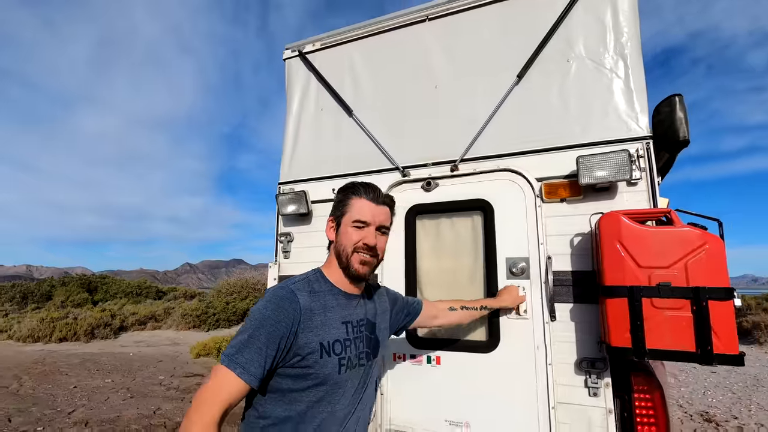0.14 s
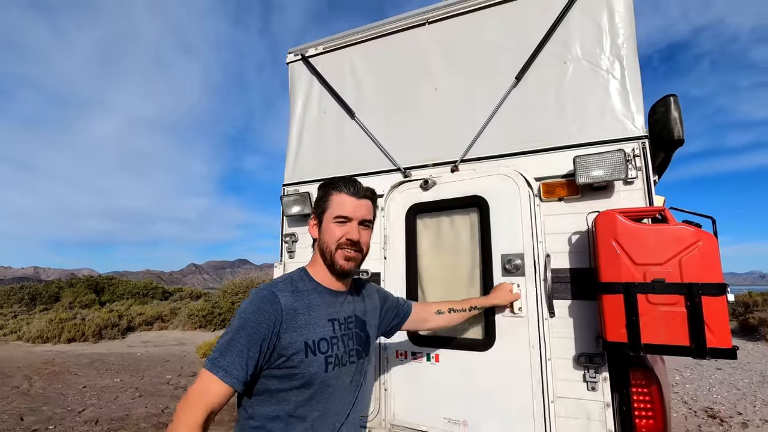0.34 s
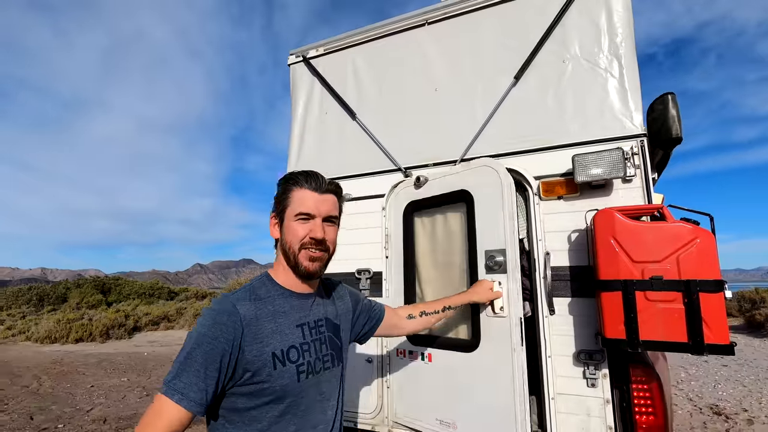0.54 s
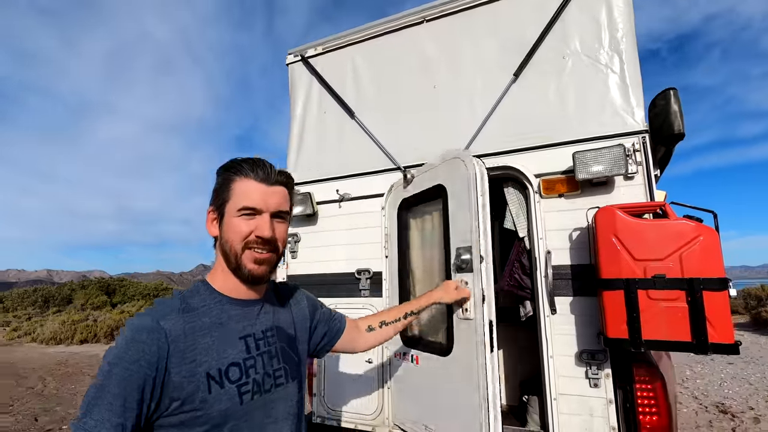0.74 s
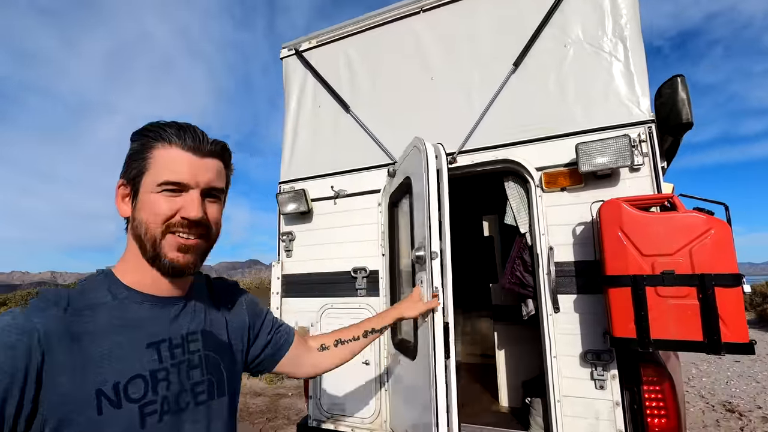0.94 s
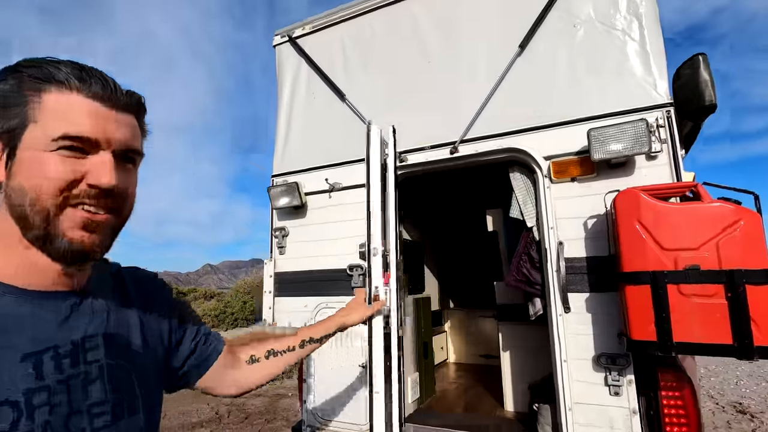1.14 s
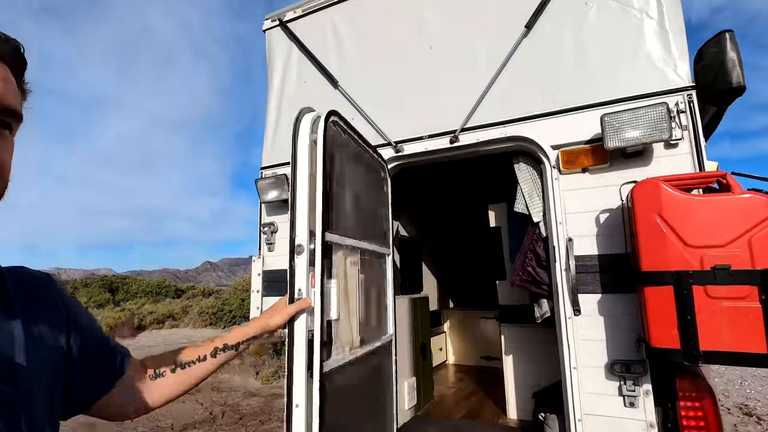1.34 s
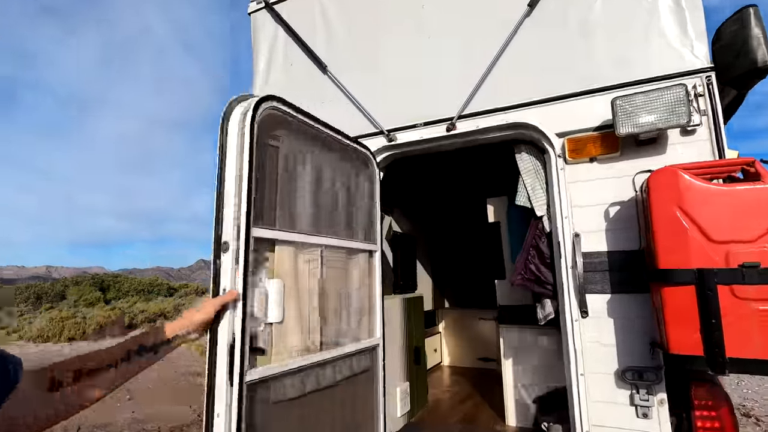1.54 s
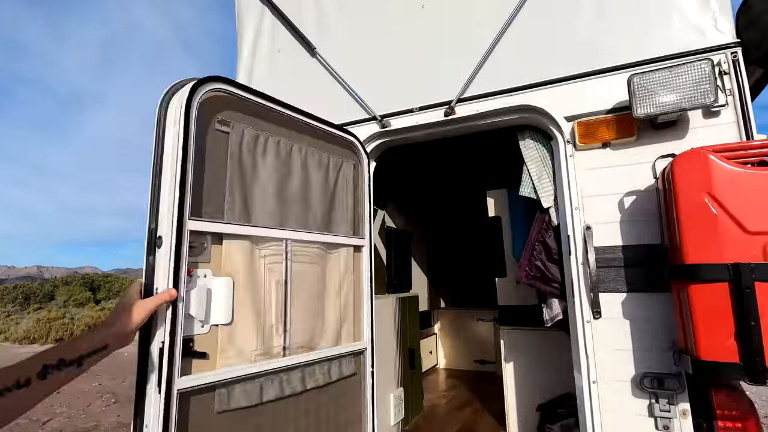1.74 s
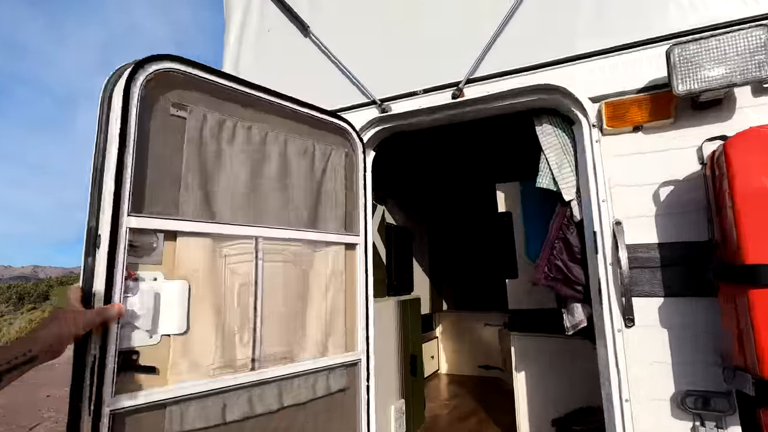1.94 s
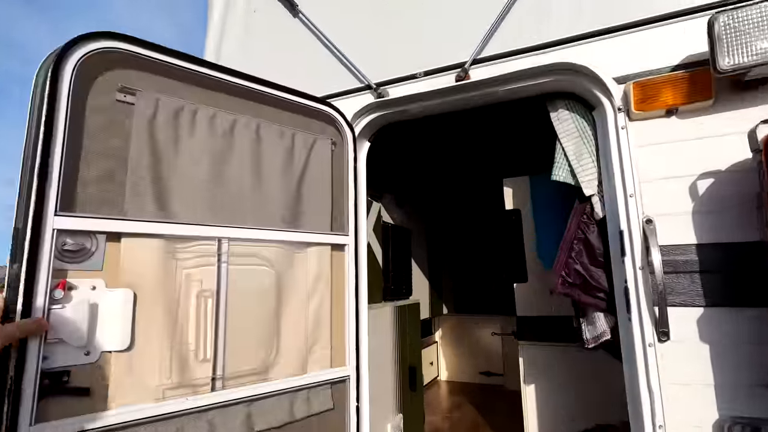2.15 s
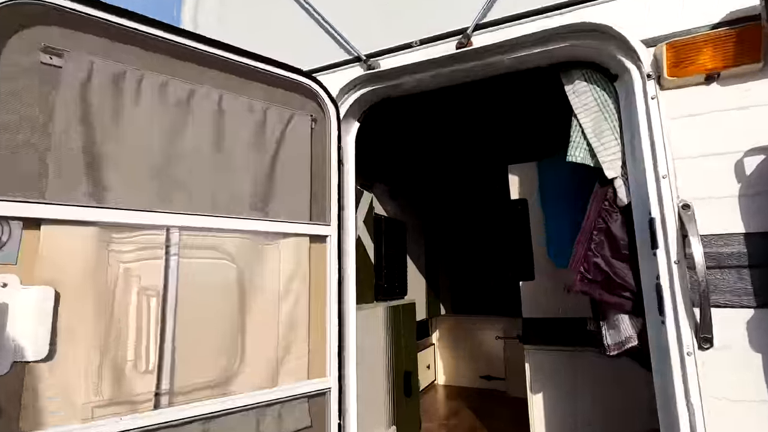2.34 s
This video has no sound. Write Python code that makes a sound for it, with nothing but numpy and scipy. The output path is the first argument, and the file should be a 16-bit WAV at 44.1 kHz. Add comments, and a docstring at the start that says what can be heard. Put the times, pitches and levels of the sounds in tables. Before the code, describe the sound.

A camper door opens, heard close up outdoors with little echo. Faint ticks and handle scraping lead to a loud, hollow latch clunk at 0.24 s, with clatter to 0.35. Small knocks and a squeak precede a sharp bright snap at 0.75 s, ringing thinly. Soft seal and hinge rubbing follows, light taps near 1.1 and 1.67, then a dull rattling bump and creak at 2.12, over low engine hum.

```python
"""A camper's back door is unlatched and pulled open at arm's length, outdoors, over a small engine's hum.
The latch lets go with a thud; blows are chatters of contacts that ring the damped modes of latch and door.
The door squeaks by stick-slip and snaps free with a ringing spring, both made of decaying or gliding sines.
Shaped noise makes the handle's scraping, the rubbing of seal and hinge, and the final rattling bump.
The engine is a sum of sines at multiples of its firing rate, over filtered-noise rumble and open-air hiss."""
import sys
import numpy as np
from scipy import signal
from scipy.fft import rfft, irfft
from scipy.io import wavfile
from scipy.ndimage import uniform_filter1d

SR = 44100
rng = np.random.default_rng(int(sys.argv[2]) if len(sys.argv) > 2 else 0)


def generate_wav(signal):
    """Clip the signal to [-1, 1] and save it as 16-bit WAV at the path in sys.argv[1]."""
    frames = np.transpose(np.atleast_2d(signal))
    scaled = np.clip(frames, -1, 1) * 32767
    pcm = np.round(scaled).astype(np.int16)
    wavfile.write(sys.argv[1], SR, pcm)


N = 110250  # samples, 2.5 s

# Clicks and clunks of handle and latch; levels are relative, before the struck part colours them.
# Columns: start_s, level_450hz_db, level_1400hz_db, level_3300hz_db, level_9khz_db, t60_s
LATCH_BLOWS = [(.05,-69,-44,-56.5,-83,0.075), (.0755,-49,-36.5,-58.5,-79.5,0.04),
               (.182,-30,-42.5,-48.5,-72,0.13), (.206,-25,-46.5,-41.5,-64.5,0.074),
               (.231,-22.5,-48,-37.5,-64.5,0.19), (.2412,-5.5,-34,-19.5,-48.5,0.038),
               (.2455,-6.5,-10,-12,-32,0.025), (.2522,-19.5,-18,-15,-38.5,0.041),
               (.263,-21,-31,-26,-49.5,0.06), (.288,-31,-31.5,-29.5,-83,0.065),
               (.3235,-40,-43,-28.5,-55,0.064), (.3315,-24.5,-27,-18,-47.5,0.043)]
# Knocks of door and frame. Columns: as for the latch blows
DOOR_BLOWS = [(.3835,-28.5,-30.5,-37.5,-51,0.093), (.479,-74,-33.5,-77,-86,0.02),
              (.519,-41,-58.5,-49.5,-58,0.083), (.594,-50,-44,-42.5,-68,0.027),
              (.639,-66,-54.5,-53,-62,0.048), (.6788,-52,-47,-46,-70,0.057), (.701,-39,-37,-41.5,-71,0.11),
              (.714,-23.5,-35,-56,-53,0.055), (.7492,-39,-19.5,-7.5,-47.5,0.068),
              (.7575,-17,-9.5,-8,-33.5,0.034), (.7625,-12.5,-24.5,-16,-39.5,0.04),
              (.7685,-10,-23,-18,-52,0.057), (.796,-27,-29,-49,-74,0.077), (1.093,-44,-47.5,-53.5,-80,0.13),
              (1.117,-44.5,-35,-31,-52.5,0.046), (1.652,-45,-37,-51.5,-77.5,0.034),
              (1.656,-36.5,-43,-57,-74,0.053), (1.6665,-33.5,-35,-52,-74,0.082),
              (1.7035,-65,-47,-41,-75,0.015), (1.778,-72,-68,-50.5,-56,.015),
              (2.1115,-54.5,-45.5,-19.5,-73.5,0.046), (2.281,-57,-53,-43,-66,.05),
              (2.418,-52.5,-58.5,-60.5,-73.5,0.14)]
# Frequencies at which the blow levels are given. Column: frequency_hz
BLOW_BAND_HZ = [450, 1400, 3300, 9000]
# Colour shared by all blows. Columns: frequency_hz, gain_db
BLOW_COLOUR = [(30,-21), (150,-10), (400,4.5), (600,5), (900,4.5), (1400,4.5), (3000,3), (5000,2.5),
               (6500,-6.5), (9000,-4), (12000,-11), (15500,-19.5)]
# Resonances of the latch case. Columns: mode_hz, t60_s, relative_level_db
LATCH_MODES = [(441,0.025,0), (553.6,0.038,-4), (1410,0.0315,8), (1555,.07,-3.5), (1810,0.057,-17),
               (2108,0.042,6), (2540,0.051,-3.5), (3027,0.051,-4), (3610,0.048,-8.5), (4300,0.033,-4),
               (4670,0.033,-3)]
# Hollow middle of the latch case. Columns: frequency_hz, gain_db
LATCH_COLOUR = [(540,0), (760,-6), (1050,-7), (1400,-1)]
# Metal latch parts left ringing. Columns: start_s, pitch_hz, level_db, t60_s, damped_at_s
LATCH_RINGS = [(.3845,3268,-42,0.16,0.448), (.384,9000,-58.5,.04,.44), (0.74,2702,-51.5,0.753,1.1),
               (0.83,2700,-63.5,0.64,0.82), (.76,3607,-64,.45,0.79)]
# Resonances of the door. Columns: mode_hz, t60_s, relative_level_db
DOOR_MODES = [(380,0.093,-3), (464.5,0.063,5), (657,0.045,-15), (1057,0.07,0.5), (1180,.04,2),
              (1352,0.035,2), (1890,0.043,-3.5), (2236,.05,3.5), (2590,0.036,-3.5), (3310,0.024,3.5),
              (3860,0.027,-11)]
# Thuds of the wall and door panel. Columns: start_s, pitch_hz, level_db, t60_s
THUDS = [(.096,38,-31.5,0.19), (.121,173,-27,0.039), (.207,195.3,-22,0.07), (.2415,196.5,-15,0.076),
         (.2435,98.3,-12,0.12), (.2612,42,-14,0.25), (.263,165,-19.5,0.15), (.761,175.3,-31,0.11),
         (1.682,220,-31.5,0.0615), (2.122,97.9,-20.5,0.42), (2.124,198.5,-27.5,0.22),
         (2.125,34.8,-32.5,0.4), (2.27,108,-30,0.16)]
# Spectrum of the last bump's rattle. Columns: frequency_hz, relative_level_db
RATTLE_COLOUR = [(90,-15), (150,-6), (210,3), (290,-19.5), (420,-14), (600,-25), (800,-15), (1100,-23),
                 (1770,-21.5), (3750,-25), (5600,-30.5), (6800,-41), (15000,-59.5)]
# Spectrum of the panel shuddering after the bump. Columns: frequency_hz, relative_level_db
PANEL_COLOUR = [(110,-4), (200,14.5), (300,-3), (700,-4), (1300,-16), (3500,-29.5), (7000,-47)]
# Stick-slip squeaks and creaks; levels before roughness. Columns: start_s, length_s, first_hz, last_hz, level_db
SQUEAKS = [(0,0.048,1434,1435,-56), (0.242,0.0046,1560,1503,-22), (.285,0.0096,1560,1600,-28),
           (0.693,0.025,1372,1290,-38), (0.709,0.023,2950,2900,-37.5), (.71,0.035,2522,2156,-44.5),
           (0.711,0.029,4660,4730,-41), (0.736,.012,4635,4850,-30.5), (0.794,0.016,1283,1160,-38),
           (2.132,0.054,773,647,-34.5), (2.192,0.048,690,759,-44), (2.213,0.078,511,402.4,-50)]
# Scraping in the door skin as the hand works the handle. Columns: time_s, level_db
HANDLE_LEVEL = [(0,-44.5), (.085,-51), (.15,-57), (.215,-30), (.27,-33), (.33,-42), (.43,-59)]
# Dull spectrum of that scraping. Columns: frequency_hz, relative_level_db
HANDLE_COLOUR = [(80,-13.5), (200,16), (300,-2.5), (560,0), (850,-14), (1250,-14.5), (1450,-9.5),
                 (1700,-19), (2000,-10.5), (2500,-24), (4000,-29.5), (5100,-26.5), (6500,-44.5),
                 (15000,-67)]
# Rubbing of seal and hinge, before rustle and final fade. Columns: time_s, level_db
RUB_LEVEL = [(.16,-92), (.3,-58), (.56,-74.5), (.61,-59), (.67,-63.5), (.71,-52), (.75,-40), (.83,-70),
             (1.07,-71), (1.15,-61), (1.22,-73), (1.54,-73), (1.58,-65.5), (1.62,-74.5), (1.7,-62.5),
             (1.76,-72), (1.825,-58), (1.88,-61), (1.95,-55.5), (2.0,-63.5), (2.07,-71), (2.11,-50)]
# Spectrum of the rubbing. Columns: frequency_hz, relative_level_db
RUB_COLOUR = [(100,11.5), (450,-1), (1500,1.5), (3000,-1.5), (5400,-6.5), (6800,-16), (10000,-23),
              (16000,-46)]
# Firing rate of the engine. Columns: time_s, firing_hz
ENGINE_SPEED = [(0,70.38), (.55,73.54), (.95,72.9), (1.15,75.44), (2.5,80.68)]
# Partials of the hum; levels before waver and shading. Columns: firing_multiple, rms_level_db
ENGINE_ORDERS = [(1,-42), (1.5,-55), (2,-50.5), (3,-70.5)]
# Gain of hum and rumble as the microphone moves. Columns: time_s, gain_db
ENGINE_SHADE = [(2.35,-1.5), (2.5,-6)]
# Spectrum of the low rumble. Columns: frequency_hz, relative_level_db
RUMBLE_COLOUR = [(20,-12.5), (45,-0.5), (100,-2), (180,-5), (250,-20.5), (400,-36), (1000,-75.5)]
# Spectrum of the open-air hiss. Columns: frequency_hz, relative_level_db
OUTDOORS_COLOUR = [(180,-13), (300,1), (380,-7), (550,-10.5), (1900,-20.5), (4100,-25), (5600,-14.5),
                   (6600,-21.5), (7800,-16.5), (10000,-38.5), (15000,-70)]

CONTACT_S = 0.00025  # rise time constant of a hard contact
TREBLE_HZ, TREBLE_T60_S = 4500, 0.11  # the contacts soften as a blow dies
AIR_T60_S, AIR_DB = 0.4, -30.5  # scatter from the camper wall and the ground
LATCH_MODES_DB, LATCH_CRACK_DB = -40, -0.5
DOOR_MODES_DB, DOOR_CRACK_DB = -46, 0
DAMPED_T60_S = 0.04  # decay of a ringing part once touched
THUD_RISE_S = 0.002
BUMP_S, BUMP_RISE_S, BUMP_HOLD_S = 2.112, 0.019, 0.02
RATTLE_DB, RATTLE_T60_S = -27.5, 0.28
PANEL_DB, PANEL_T60_S = -32, 0.63
BUMP_TREBLE_HZ, BUMP_TREBLE_T60_S = 6000, 0.6
SQUEAK_WOBBLE, SQUEAK_ROUGH_DB = 0.022, 4  # pitch spread as a fraction; largest level swing
SQUEAK_RASP_DB, SQUEAK_RASP_WIDTH = -11, 0.25  # width as a fraction of the first pitch
HANDLE_GRAIN, RUB_GRAIN, BUMP_GRAIN = 0.7, 0.36, 0.4  # unevenness of the contacts
RUSTLE_DB, RUSTLE_HZ = 3.5, 30
ENGINE_WAVER_DB = 2
RUMBLE_DB, OUTDOORS_DB = -49, -75.5
TOP_HZ = 15700


def undb(db):
    """Amplitude ratio: 20 dB is a factor of ten."""
    return 10 ** (np.asarray(db) / 20)


def unit(x):
    """Normalization to a root-mean-square value of 1."""
    return x / np.sqrt(np.mean(x ** 2))


def since(start):
    """Elapsed time in seconds, zero before the start."""
    return np.maximum(np.arange(N) / SR - start, 0)


def curve(rows):
    """Linear interpolation through (time_s, value) rows."""
    return np.interp(since(0), *np.array(rows).T)


def fade(t, t60):
    """Exponential decay, falling 60 dB in each t60."""
    return np.exp(-np.log(1000) * t / t60)


def walk(hz):
    """Smoothed random fluctuation of rms 1, drawn anew about hz times a second."""
    hold = max(int(SR / hz), 1)
    steps = np.repeat(rng.standard_normal(N // hold + 1), hold)
    return unit(uniform_filter1d(steps, hold)[:N])


def lowpass(x, order, hz):
    """Butterworth low-pass filtering: the part of the sound below a cutoff."""
    return signal.sosfilt(signal.butter(order, hz, fs=SR, output="sos"), x)


def colour(x, points, size=4096):
    """Minimum-phase filtering: a causal response through (frequency_hz, gain_db) points."""
    hz, db = np.array(points).T
    bins_hz = np.arange(size // 2 + 1) * SR / size
    gain = undb(np.interp(np.log(bins_hz + 1), np.log(hz), db))
    # folding the cepstrum onto positive time makes the response causal
    cepstrum = irfft(np.log(gain))
    cepstrum[1:size // 2] *= 2
    cepstrum[size // 2 + 1:] = 0
    response = irfft(np.exp(rfft(cepstrum)))
    return signal.fftconvolve(x, response)[:len(x)]


def contact_chatter(t, t60):
    """Multiple contact: random pushes either way die out, their treble dying faster."""
    chatter = rng.choice([-1., 1.], len(t)) * fade(t, t60) * (1 - np.exp(-t / CONTACT_S))
    soft = lowpass(chatter, 1, TREBLE_HZ)
    return soft + (chatter - soft) * fade(t, TREBLE_T60_S)


def ring(push, modes):
    """Modal resonance: a push convolved with a sum of damped cosines."""
    t = since(0)[:SR // 4]
    response = sum(undb(db) * fade(t, t60) * np.cos(2 * np.pi * hz * t) for hz, t60, db in modes)
    return signal.fftconvolve(push, response)[:N]


def scatter(struck):
    """Diffuse reflection: the sound convolved with decaying noise of unit energy."""
    air = rng.standard_normal(N) * fade(since(0), AIR_T60_S)
    return undb(AIR_DB) * signal.fftconvolve(struck, air / np.linalg.norm(air))[:N]


def blows(rows, modes, modes_db, crack_db):
    """Impact excitation: each chatter is heard as a crack and also rings the struck part."""
    push = np.zeros(2 * N)
    t = since(0)[:SR // 5]
    for start, *band_levels, t60 in rows:
        i = int(start * SR)
        push[i:i + len(t)] += colour(contact_chatter(t, t60), list(zip(BLOW_BAND_HZ, band_levels)))
    push = colour(push[:N], BLOW_COLOUR)
    struck = undb(crack_db) * push + undb(modes_db) * ring(push, modes)
    return struck + scatter(struck)


def tones(rows, rise):
    """Free damped oscillation: each struck part swings at one pitch and dies away."""
    out = 0
    for start, hz, db, t60 in rows:
        t = since(start)
        envelope = fade(t, t60) * (1 - np.exp(-t / rise))
        out = out + undb(db) * np.sin(2 * np.pi * hz * t) * envelope
    return out


def latch_rings():
    """Added damping: metal parts sing until touched, then decay quickly."""
    out = 0
    for *tone, damped_at in LATCH_RINGS:
        out = out + tones([tone], CONTACT_S) * fade(since(damped_at), DAMPED_T60_S)
    return out


def latch():
    """Impact and resonance: latch blows and ringing metal, the blows hollowed by the case."""
    struck = blows(LATCH_BLOWS, LATCH_MODES, LATCH_MODES_DB, LATCH_CRACK_DB)
    return colour(struck, LATCH_COLOUR) + latch_rings()


def door():
    """Impact and resonance: knocks, low panel thuds and the closing bump."""
    knocks = blows(DOOR_BLOWS, DOOR_MODES, DOOR_MODES_DB, DOOR_CRACK_DB)
    return knocks + tones(THUDS, THUD_RISE_S) + bump()


def grit(grain):
    """Asperity contact: dense noise whose strength fluctuates log-normally."""
    return rng.standard_normal(N) * np.exp(grain * walk(350))


def bump():
    """Unequal damping: a bright rattle swells, dulls and dies while the panel shudders longer."""
    swell = np.minimum(since(BUMP_S) / BUMP_RISE_S, 1)
    after = since(BUMP_S + BUMP_RISE_S + BUMP_HOLD_S)
    rattle = undb(RATTLE_DB) * unit(colour(grit(BUMP_GRAIN), RATTLE_COLOUR)) * fade(after, RATTLE_T60_S)
    panel = undb(PANEL_DB) * unit(colour(grit(BUMP_GRAIN), PANEL_COLOUR)) * fade(after, PANEL_T60_S)
    both = swell * (rattle + panel)
    dull = lowpass(both, 2, BUMP_TREBLE_HZ)
    return dull + (both - dull) * fade(after, BUMP_TREBLE_T60_S)


def squeaks():
    """Stick-slip friction: short tones glide and waver, with a noisy rasp around the pitch."""
    out = 0
    for start, length, first_hz, last_hz, db in SQUEAKS:
        along = np.clip(since(start) / length, 0, 1)
        hz = first_hz + (last_hz - first_hz) * along
        phase = 2 * np.pi * np.cumsum(hz * (1 + SQUEAK_WOBBLE * walk(600))) / SR
        swell = np.tanh(2 * np.sin(np.pi * along))
        rasp = undb(SQUEAK_RASP_DB) * walk(first_hz * SQUEAK_RASP_WIDTH) * np.cos(phase)
        level = undb(db + SQUEAK_ROUGH_DB * np.tanh(walk(500)))
        out = out + level * swell * (np.sin(phase) + rasp)
    return out


def handle():
    """Sliding friction: gritty scraping while the handle is gripped and pulled."""
    scrape = unit(colour(grit(HANDLE_GRAIN), HANDLE_COLOUR))
    last_s = HANDLE_LEVEL[-1][0]
    return scrape * undb(curve(HANDLE_LEVEL)) * fade(since(last_s), 0.5)


def rubbing():
    """Sliding friction: grainy rustles, dull and bright by turns, fade from the last bump on."""
    slide = unit(colour(grit(RUB_GRAIN), RUB_COLOUR))
    dull = lowpass(slide, 1, 2000)
    rustle = 0
    for part in (dull, slide - dull):
        rustle = rustle + part * undb(RUSTLE_DB * np.tanh(walk(RUSTLE_HZ)))
    return rustle * undb(curve(RUB_LEVEL)) * fade(since(BUMP_S), 0.75)


def engine():
    """Periodic combustion: wavering sines at multiples of a firing rate that rises overall."""
    phase = 2 * np.pi * np.cumsum(curve(ENGINE_SPEED)) / SR
    hum = 0
    for multiple, db in ENGINE_ORDERS:
        level = undb(db + ENGINE_WAVER_DB * walk(23)) * np.sqrt(2)  # rms to peak
        hum = hum + level * np.sin(multiple * phase + rng.uniform(0, 2 * np.pi))
    return hum


def background():
    """Superposition: engine hum and low rumble are shaded together over a steady open-air hiss."""
    rumble = undb(RUMBLE_DB) * unit(colour(rng.standard_normal(N), RUMBLE_COLOUR))
    hiss = undb(OUTDOORS_DB) * unit(colour(rng.standard_normal(N), OUTDOORS_COLOUR))
    return undb(curve(ENGINE_SHADE)) * (engine() + rumble) + hiss


def scene():
    """Superposition: door and surroundings add at one microphone."""
    return (latch() + door() + squeaks() + handle() + rubbing() + background())[None]


def record(dry):
    """Band limitation: a steep elliptic low-pass in the recorder cuts the top."""
    return signal.sosfilt(signal.ellip(8, .2, 70, TOP_HZ, fs=SR, output="sos"), dry)


dry = scene()
out = record(dry)
generate_wav(out)
```